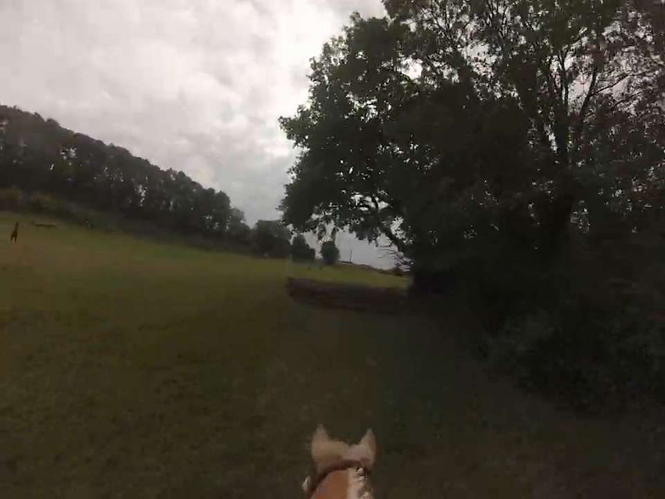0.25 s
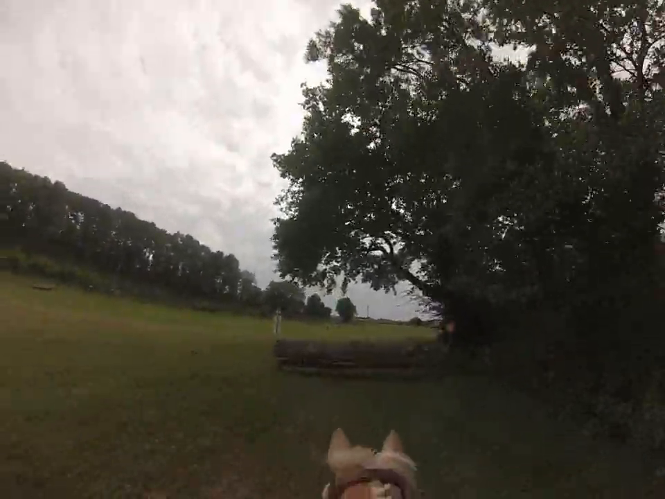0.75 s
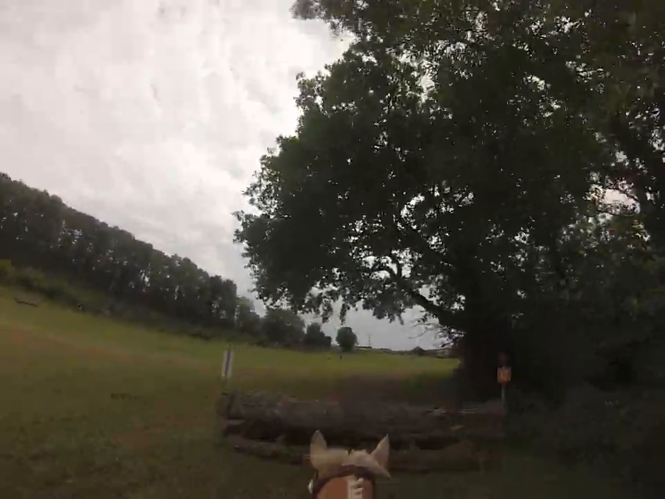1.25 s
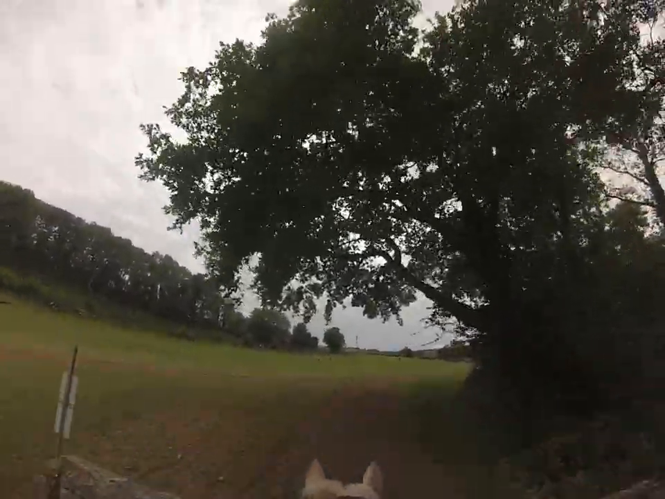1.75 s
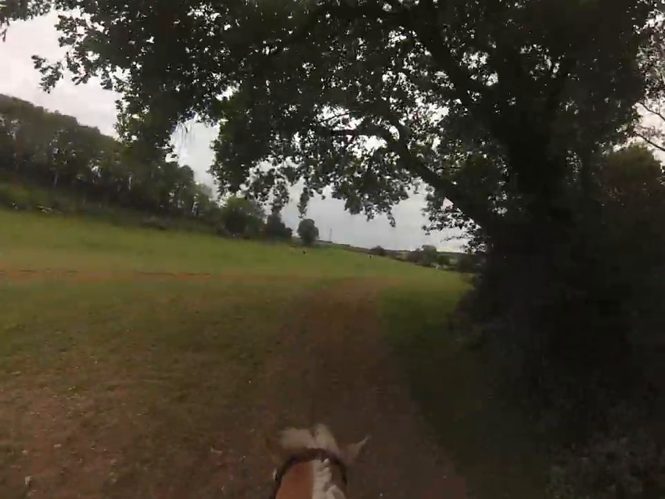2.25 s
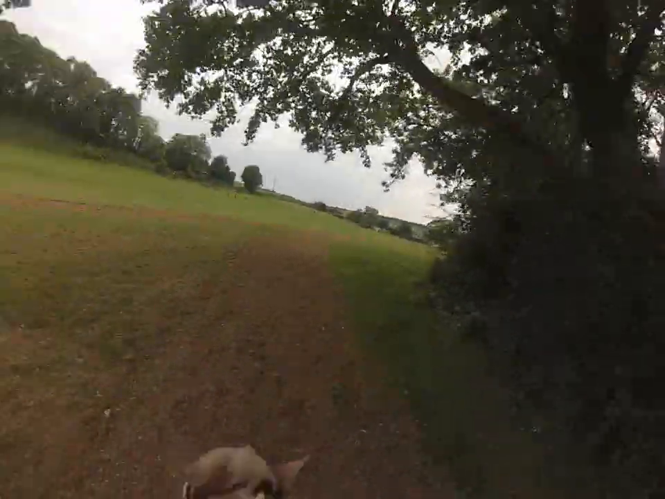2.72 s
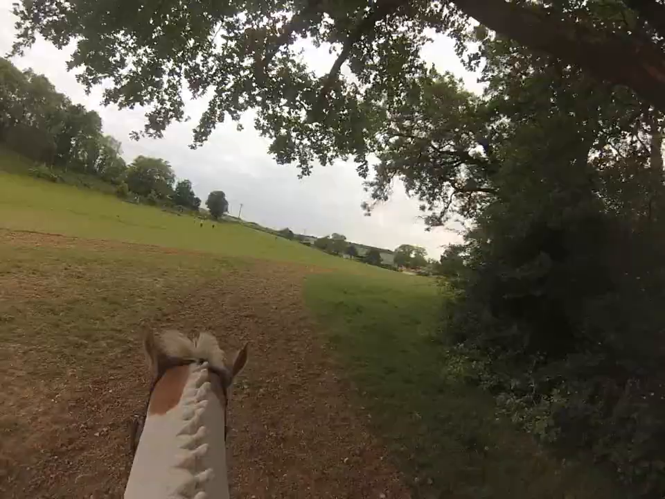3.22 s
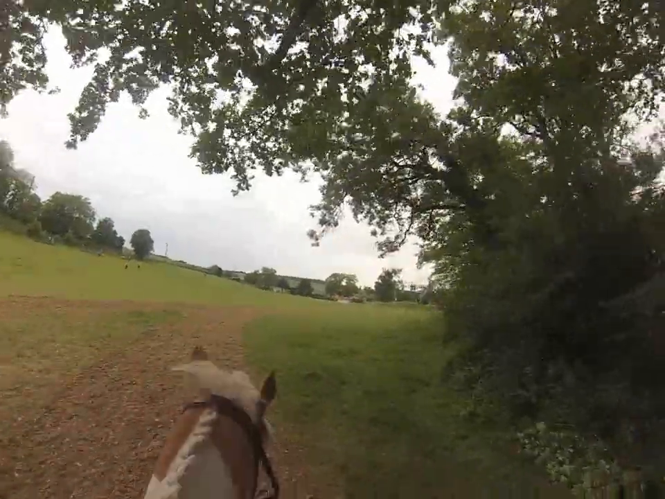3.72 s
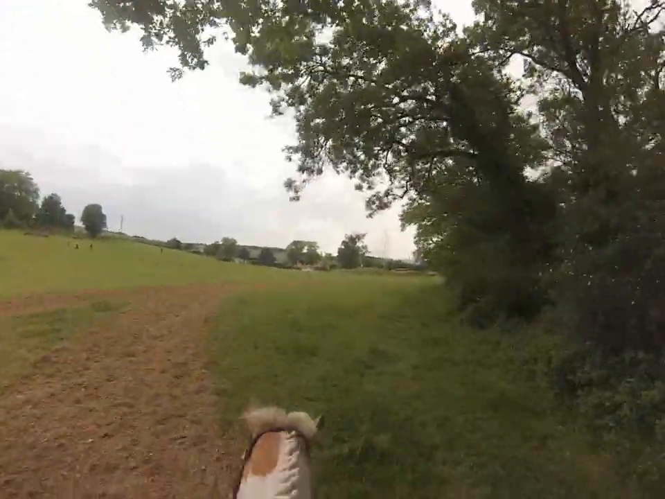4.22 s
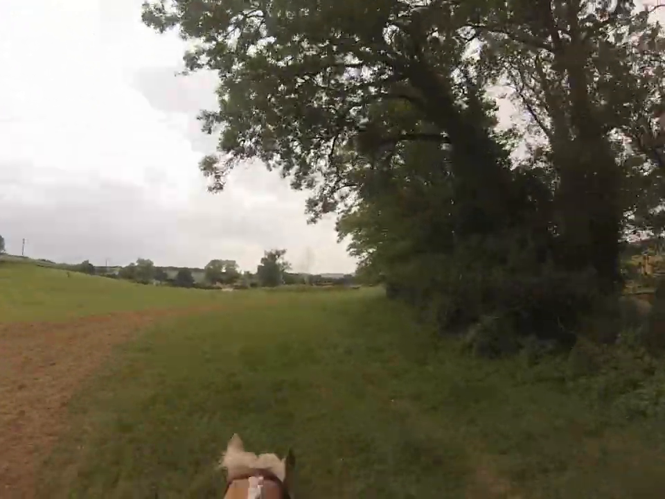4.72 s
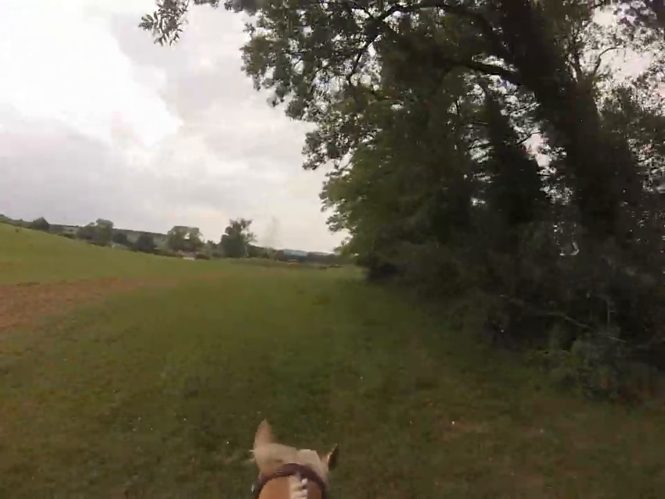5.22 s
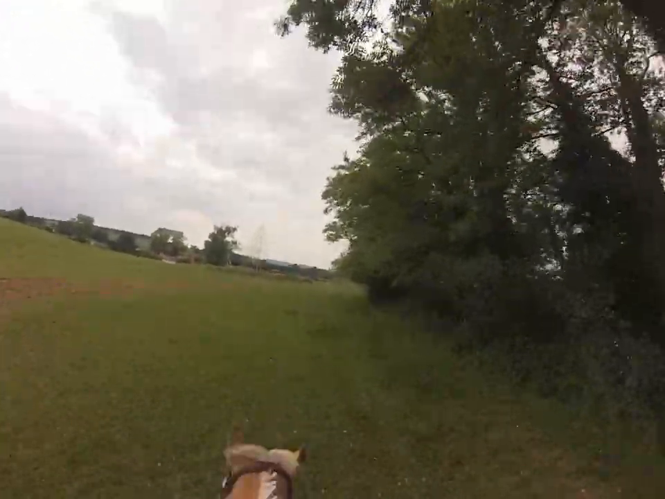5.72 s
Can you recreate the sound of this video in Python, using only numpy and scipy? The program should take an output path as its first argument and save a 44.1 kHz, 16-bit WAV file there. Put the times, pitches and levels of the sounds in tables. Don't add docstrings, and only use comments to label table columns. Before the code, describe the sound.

Boxy wind rumble and airy roar fill a rider's helmet microphone as a horse gallops across grass and over a log. Dull low hoofbeats climb through the body, irregular at first, hard after landing, then regular and softer. The case rattles and knocks with the strides, deep jolts thump the mount, bit and buckles tick closely, and leather squeaks twice, very briefly.

```python
import sys
import numpy as np
from scipy import signal
from scipy.fft import rfft, irfft
from scipy.io import wavfile
from scipy.ndimage import uniform_filter1d

SR = 44100
rng = np.random.default_rng(int(sys.argv[2]) if len(sys.argv) > 2 else 0)


def gain_from_decibels(decibels):
    exponent = np.asarray(decibels, float) / 20
    return 10 ** exponent


def put_to_file(sound):
    columns = np.atleast_2d(sound).T
    safe = np.clip(columns, -1, 1)
    whole_steps = np.round(safe * 32767)
    wavfile.write(sys.argv[1], SR, whole_steps.astype(np.int16))


N = 262832

# (time [s], airspeed as roar level [dB], buffeting level [dB])
WIND = [(0, -62.5, -57), (.35, -66, -64.5), (.6, -60.5, -64.5), (.98, -72, -64.5), (1.15, -63, -66),
        (1.4, -68.5, -65), (1.85, -66, -61.5), (2.28, -71, -63.5), (2.6, -63, -54.5), (2.95, -72, -62.5),
        (3.55, -68, -58), (3.9, -64.5, -59.5), (4.2, -62, -58.5), (4.4, -64.5, -62), (4.68, -57.5, -60),
        (4.95, -62, -57.5), (5.6, -58, -56), (5.96, -58.5, -57.5)]
# (frequency [Hz], density [dB per Hz])
TURBULENCE = [(40, -41), (65, 2), (100, 2), (165, 5), (240, -5.5), (350, -15.5), (500, -47.5)]
# (frequency [Hz], gain [dB per Hz])
CASE_WALLS = [(60, -1.5), (110, -3.5), (220, 4.5), (450, -2.5), (660, -7), (780, -3.5), (1020, -32),
              (1250, -8), (1420, 1), (2400, -4.5), (2850, -17.5), (3700, -24.5), (5300, -29), (6000, -32.5),
              (13000, -46)]
# (frequency [Hz], width [Hz], lift [dB])
AIR_POCKETS = [(1640, 130, 2), (3085, 150, 6), (3830, 150, 6), (5030, 200, 4)]
# (centre time [s], level [dB], length [s])
SWINGS = [(0.106, -44.5, 0.1), (0.285, -46.5, 0.19), (0.468, -51.5, .14), (0.696, -48, 0.22),
          (0.868, -45, 0.33), (1.143, -56, .12), (1.276, -48, 0.09), (1.414, -43.5, 0.24),
          (1.595, -45.5, 0.15), (1.778, -38.5, 0.28), (1.934, -40, 0.23), (2.169, -46, 0.15),
          (2.458, -45, 0.062), (2.63, -46, 0.19), (2.744, -42.5, 0.15), (3.001, -43.5, 0.28),
          (3.313, -38, 0.11), (3.424, -39, .12), (3.66, -40.5, 0.074), (3.756, -40.5, 0.099),
          (3.831, -39, 0.08), (3.925, -41, .16), (4.13, -39, 0.11), (4.449, -41.5, 0.13),
          (4.663, -53, 0.21), (4.896, -43, 0.16), (5.146, -59, .4), (5.504, -55, .14), (5.697, -56, 0.11),
          (5.844, -45, 0.097)]
# (time [s], peak level [dB], pitch [Hz], ring t60 [s])
JOLTS = [
    (2.76, -28, 39, 0.37),
    (3.47, -33, 42.2, 0.21),
    (4.215, -24.5, 41, 0.23),
    (4.32, -21.5, 41, 0.21),
    (5.375, -31, 41, 0.28),
]
# (time [s], peak level [dB], pitch [Hz])
HOOVES = [(0.076, -52.5, 172), (0.249, -46.5, 211), (0.35, -50, 153), (1.621, -45.5, 173.5),
          (1.758, -49, 138), (1.828, -41, 121), (2.067, -39.5, 116), (2.36, -51, 215), (2.486, -47.5, 179),
          (2.561, -47.5, 205), (2.633, -41, 152), (2.669, -33, 135), (2.984, -50.5, 206), (3.19, -47, 194),
          (3.292, -49.5, 109), (3.357, -34, 165), (3.422, -27.5, 138.5), (3.645, -35, 170),
          (3.706, -37, 180), (3.898, -50, 159), (4.102, -34, 168.6), (4.372, -42, 117), (4.631, -42.5, 165),
          (4.9, -40, 188.5), (5.197, -44.5, 188.5), (5.465, -46.5, 155), (5.69, -48, 180),
          (5.777, -52, 155), (5.831, -39, 153), (5.902, -47, 140)]
# (time [s], peak level [dB], relative treble [dB], length [s],
# swell [-1 fading to 1 growing])
RATTLES = [(0.246, -48, -9, 0.04, -0.15), (0.271, -51, -8, 0.049, 0.17), (1.76, -58, -12, 0.028, -0.36),
           (1.805, -61, 0, 0.077, 0.15), (1.913, -76, 7, 0.017, 0.49), (2.017, -60.5, -8.5, 0.16, -0.36),
           (2.345, -58.5, -15, 0.13, -0.61), (2.428, -63, -6, 0.12, -0.038),
           (2.535, -52.5, -4, 0.071, -0.57), (2.623, -43.5, -7.5, 0.055, -0.83),
           (2.648, -64, 0, 0.16, -0.38), (3.16, -58.5, -8.5, 0.1, -0.27), (3.295, -53, -4.5, 0.04, -0.34),
           (3.33, -49.5, -7.5, 0.081, 0.2), (3.386, -42, -5, 0.054, 0.7), (3.424, -45.5, -5, 0.02, -0.22),
           (3.439, -60.5, 4, 0.026, -0.81), (3.636, -50.5, -5, 0.07, -0.49), (3.683, -48, -5, 0.081, 0.087),
           (3.742, -52, -4, 0.063, -0.32), (4.081, -49, -1, 0.071, 0.026), (4.142, -64.5, 8, 0.087, 0.18),
           (4.857, -53.5, -15, 0.053, -0.076), (5.814, -50, -8.5, 0.043, -0.049)]
# (time [s], peak level [dB], pitch [Hz], ring t60 [s])
SHELL_RINGS = [(.288, -47, 425, 0.068), (.298, -54.5, 635, 0.03), (2.25, -62, 422, 0.071),
               (1.79, -57.5, 1624, 0.06), (1.855, -58.5, 756, 0.049), (1.92, -55.5, 1440, 0.027),
               (1.978, -61, 730, 0.035), (3.648, -52, 601, 0.047), (1.848, -56, 1710, 0.044),
               (1.87, -43.5, 90, 0.079), (2.638, -48, 450, 0.093), (3.405, -56, 243, 0.068),
               (3.41, -47, 94, 0.15), (3.645, -37, 94, 0.06), (3.715, -44, 95, 0.2),
               (3.72, -48.5, 516, 0.14), (4.108, -46, 1660, 0.048), (5.49, -49, 93, 0.25)]
# (time [s], level [dB], relative level of the duller part [dB])
TICKS = [(0.6464, -64, -8), (0.7444, -74, 11), (0.7774, -58, -21), (2.0749, -65, -11), (2.4518, -68, 9),
         (2.6759, -67, -6), (2.728, -77, 9), (2.7369, -70, -6), (2.77, -51, -7), (3.3727, -69, -4),
         (3.376, -50, -11), (3.4404, -63, 1), (3.774, -70, 7), (3.8421, -74, 1), (3.863, -51, -8),
         (3.8903, -71, -8), (3.9239, -71, -9), (3.93, -68, -6), (3.9339, -66, 1), (3.9979, -57, -4),
         (4.1291, -73, 11), (4.1617, -70, -2), (4.2202, -59, -8), (4.2221, -61, -3), (4.3813, -59, -6),
         (4.7879, -73, 4), (5.19, -74, -10), (5.3526, -75, 4), (5.5094, -77, 12)]
# (time [s], level [dB], relative level of the duller part [dB], length [s])
RUBS = [
    (1.836, -82, 7, .009),
    (2.475, -83, 5, 0.008),
    (3.434, -71, 2, 0.011),
    (3.453, -78, 2, 0.0079),
    (3.933, -84, 0, .008),
    (5.364, -78.5, 7.5, 0.0073),
]
# (time [s], peak level [dB], relative treble [dB])
KNOCKS = [(1.442, -68.5, 18), (1.761, -43, -23), (1.92, -62, 11.5), (1.979, -55, -14), (2.137, -48, -2.5),
          (2.876, -66, 12), (2.452, -47.5, -5), (3.427, -38, -11), (3.649, -45, 1), (3.776, -48, 3.5),
          (4.109, -46, 7.5), (4.342, -37.5, -7)]
# (start time [s], length [s], first slip rate [Hz], level [dB], roughness [0-1])
SQUEAKS = [
    (3.076, 0.043, 4460, -58.5, 0.7),
    (4.925, .04, 4310, -61.5, 0.24),
]
# (frequency [Hz], density [dB per Hz])
HISS = [(2000, -6), (4000, 5), (9000, 2), (12700, -1.5), (13200, -5), (16000, -11)]

HISS_DB = -84.5
LEAK_DB = -12
BODY_DB, BODY_SPEED, BODY_BUFFET = -65.5, 0.62, 0.39
FIZZ_DB, FIZZ_SPEED, FIZZ_HZ = -90.5, 1.08, 3330
SWAY_HZ, SWAY_WIDTH_HZ = 41, 27
REST_DB = -53.5
THUD_T60_S, THUD_SHORTER = 0.088, 2.4
TICK_S = 0.0012
SLOWING, SLOWING_LATE = 0.68, 1.4
GRIP_AT, WEAK_START_DB, WEAK_END_DB = 0.56, -14, -2
SCUFF_DB, SCUFF_ROUGH_DB, SCUFF_FADE_DB = -23, 27.5, -28
POCKET_DB = 6
SMOOTHING, DULLING_DB = 0.5, -14


def evened(x):
    return x / np.sqrt(np.mean(x ** 2) + 1e-20)


def read(points, hz):
    f, value = np.transpose(points)
    return np.interp(np.log(hz + 1), np.log(f + 1), value)


def follow(table):
    s, *columns = np.transpose(table)
    return [np.interp(np.arange(N) / SR, s, column) for column in columns]


def add(mix, s, sound):
    part = mix[max(round(s * SR), 0):][:len(sound)]
    part += sound[:len(part)]


def coloured(x, gain):
    spectrum = rfft(x) * gain(np.fft.rfftfreq(len(x), 1 / SR))
    return evened(irfft(spectrum, len(x)))


def resonate(x, hz, width_hz):
    turn = np.exp(2j * np.pi * np.cumsum(hz * np.ones(len(x))) / SR)
    r = np.exp(-np.pi * width_hz / SR)
    return 2 * (turn * signal.lfilter([1 - r], [1, -r], x / turn)).real


def case(hz):
    walls = (hz > 50) / (1 + (hz / 9000) ** 6)
    lift_db = sum(db / (1 + (2 * (hz - f) / width) ** 2) for f, width, db in AIR_POCKETS)
    return walls * gain_from_decibels(read(CASE_WALLS, hz) + lift_db)


def gusty(depth_db, span_s):
    size = max(int(span_s * SR), 1)
    smooth = uniform_filter1d(uniform_filter1d(rng.standard_normal(N), size), size)
    return gain_from_decibels(depth_db * evened(smooth)) * rng.standard_normal(N)


def split(x, leak_db=-60):
    def through(hz):
        return case(hz) + gain_from_decibels(leak_db) / (1 + ((hz - 1000) / 300) ** 4)
    body = coloured(x, lambda hz: through(hz) * (hz < 1000))
    treble = coloured(x, lambda hz: through(hz) * (hz >= 1000))
    return body, treble


def blows(events, rise_s, sag):
    out, t = np.zeros(N), np.arange(SR // 3) / SR
    for s, db, hz, t60 in events:
        envelope = (1 - np.exp(-t / rise_s)) ** 2 * gain_from_decibels(-60 * t / max(t60, 0.01))
        blow = envelope * np.sin(2 * np.pi * hz * t * (1 - sag * t))
        add(out, s - 0.004, gain_from_decibels(db) * blow / abs(blow).max())
    return out


def wind():
    roar_db, low_db = follow(WIND)
    faster, rougher = roar_db - roar_db.mean(), low_db - low_db.mean()
    body, roar = split(gusty(1.12, 0.021), LEAK_DB)
    fizz = coloured(roar, lambda hz: 1 / (1 + (FIZZ_HZ / (hz + 1)) ** 6))
    low = coloured(gusty(2.44, 0.026), lambda hz: gain_from_decibels(read(TURBULENCE, hz)))
    body_db = BODY_DB + BODY_SPEED * faster + BODY_BUFFET * rougher
    fizz_db = FIZZ_DB + FIZZ_SPEED * faster
    return gain_from_decibels(roar_db + 0.1) * roar + gain_from_decibels(body_db) * body + gain_from_decibels(fizz_db) * fizz + gain_from_decibels(low_db) * low


def sway():
    ring = resonate(resonate(rng.standard_normal(N), SWAY_HZ, SWAY_WIDTH_HZ), SWAY_HZ, 33)
    drift = coloured(rng.standard_normal(N), lambda hz: hz / (hz + 8) / (1 + (hz / 30) ** 4))
    swing = evened(ring) + 0.75 * drift
    strength = np.sqrt(abs(uniform_filter1d(swing ** 2, size=2400)))
    held = swing / (strength + 0.29) ** 0.6
    level = np.full(N, gain_from_decibels(REST_DB))
    for s, db, length in SWINGS:
        add(level, s - length / 2, gain_from_decibels(db) * signal.windows.tukey(max(int(length * SR), 8), 0.7))
    swaying = level * coloured(held, lambda hz: 1 / (1 + (hz / 52) ** 7))
    return swaying + blows(JOLTS, rise_s=0.015, sag=0.23)


def hooves():
    thuds = [(s, db, hz, THUD_T60_S * (hz / 160) ** THUD_SHORTER) for s, db, hz in HOOVES]
    return blows(thuds, rise_s=0.0028, sag=1.5)


def rattles():
    body, treble = split(gusty(2.7, 0.003))
    low, high = np.zeros((2, N))
    for s, db, treble_db, length, swell in RATTLES:
        u = np.linspace(-1, 1, max(int(length * SR), 8))
        shape = gain_from_decibels(db + 10 * swell * u) * signal.windows.tukey(len(u), 0.75)
        add(low, s, shape)
        add(high, s, gain_from_decibels(treble_db) * shape)
    return low * body + high * treble + blows(SHELL_RINGS, rise_s=0.0057, sag=0)


def ticks():
    out, t = np.zeros(N), np.arange(-768, 768) / SR
    touches = [(*tick, TICK_S) for tick in TICKS] + list(RUBS)
    for s, db, dull_db, length in touches:
        puff = rng.standard_normal(len(t))
        bright = coloured(puff, lambda hz: 1 / (1 + ((hz - 9500) / 3500) ** 6))
        dull = coloured(puff, lambda hz: 1 / (1 + ((hz - 4200) / 1500) ** 4))
        u = t / max(length, 0.0004) * np.where(t < 0, 2.2, 0.9)
        add(out, s + t[0], gain_from_decibels(db) * (bright + gain_from_decibels(dull_db - 0.5) * dull) * np.exp(-u ** 2))
    return out


def causal(gain):
    log_gain = np.log(np.maximum(gain(abs(np.fft.fftfreq(4096, 1 / SR))), 1e-3))
    h = np.fft.ifft(np.exp(np.conj(signal.hilbert(log_gain)))).real[:1024]
    return h / abs(h).max()


def knocks():
    body = causal(lambda hz: hz / (hz + 150) / (1 + (hz / 900) ** 3))
    treble = causal(lambda hz: case(hz) / (1 + (1100 / (hz + 1)) ** 8) / (1 + (hz / 3200) ** 4))
    out = np.zeros(N)
    for s, db, treble_db in KNOCKS:
        add(out, s, gain_from_decibels(db) * (body + gain_from_decibels(treble_db) * treble))
    return out


def squeak(length, first_hz, top_db, rough):
    t = np.arange(0, length, 1 / SR)
    u = t / length
    hz = first_hz * (1 - SLOWING * u ** (1 + SLOWING_LATE * rough))
    biting_db = WEAK_START_DB * (1 - u / GRIP_AT) ** 2
    easing_db = WEAK_END_DB * ((u - GRIP_AT) / (1 - GRIP_AT)) ** 4
    level_db = top_db + np.where(u < GRIP_AT, biting_db, easing_db)
    scuff_db = top_db + SCUFF_DB + SCUFF_ROUGH_DB * rough + SCUFF_FADE_DB * abs(u - 0.35)

    noise = rng.standard_normal((3, len(t)))
    uneven = np.clip(rough * (1 - SMOOTHING * u ** 2), 0, 1)
    jitter = 1.03 * uneven * uniform_filter1d(noise[0], size=60)
    turns = np.cumsum(hz * (1 + jitter)) / SR
    slips = np.zeros(len(t))
    for k, db in enumerate([0, -5, -12], 1):
        slips += gain_from_decibels(db + (k > 1) * DULLING_DB * u) * np.cos(2 * np.pi * k * turns)
    grip = gain_from_decibels(10 * uniform_filter1d(noise[1], size=90))
    blur = resonate(resonate(noise[1], hz, 1800), hz, 3000)
    stack = (1 - uneven) * evened(grip * slips) + uneven * evened(blur)
    scuff = coloured(noise[2], lambda f: 1 / (1 + ((f - 8300) / 1600) ** 2) / (1 + (f / 12500) ** 10))

    sound = (gain_from_decibels(level_db) * stack + gain_from_decibels(scuff_db) * scuff) * signal.windows.tukey(len(t), 0.06)
    sound = np.pad(sound, (0, SR // 50))
    return sound + gain_from_decibels(POCKET_DB) * sum(resonate(sound, f, width) for f, width, _ in AIR_POCKETS)


def squeaks():
    out = np.zeros(N)
    for start, *slip in SQUEAKS:
        add(out, start, squeak(*slip))
    return out


def scene():
    mix = wind() + sway() + hooves() + rattles() + ticks() + knocks() + squeaks()
    return mix[None]


def low_pass(x):
    return signal.sosfilt(signal.butter(12, 15300, fs=SR, output="sos"), x)


def record(dry):
    hiss = gain_from_decibels(HISS_DB) * coloured(rng.standard_normal(N), lambda hz: gain_from_decibels(read(HISS, hz)))
    return low_pass(dry + hiss)


dry = scene()
out = record(dry)
put_to_file(out)
```